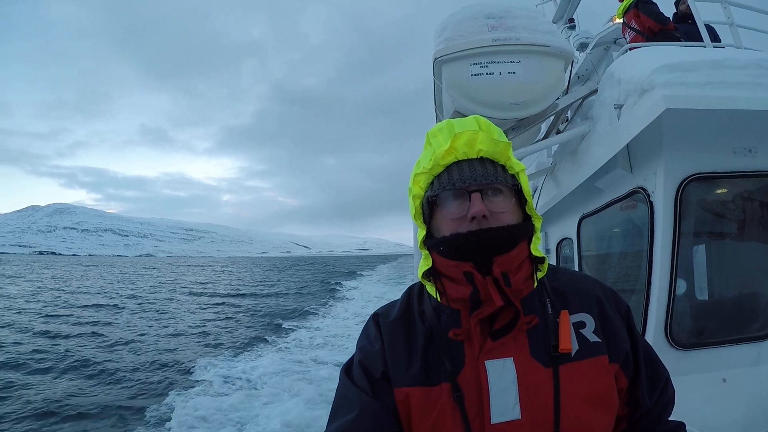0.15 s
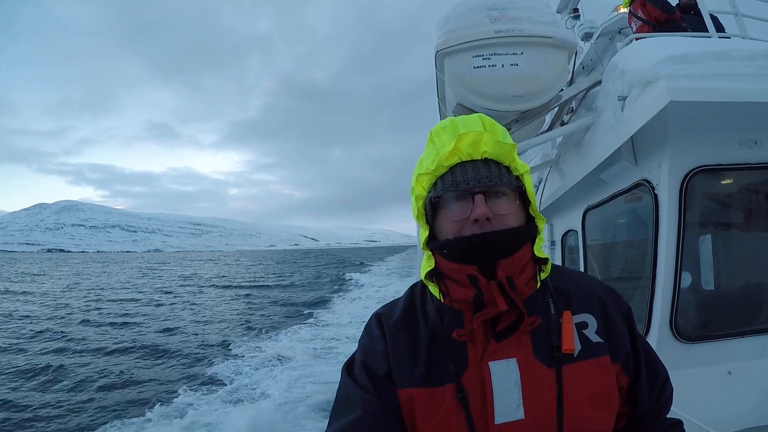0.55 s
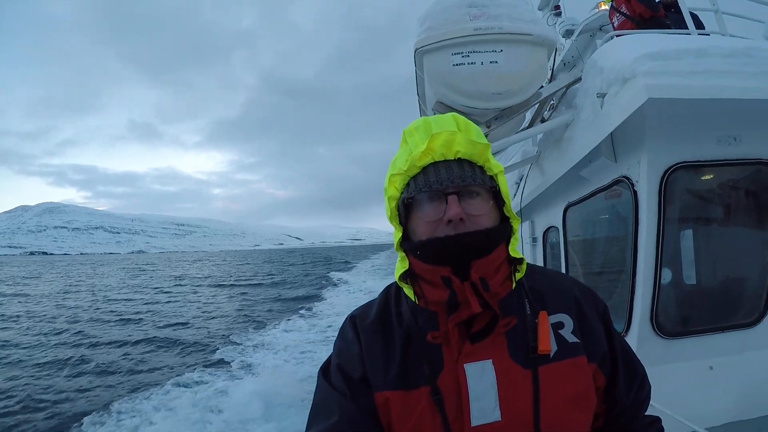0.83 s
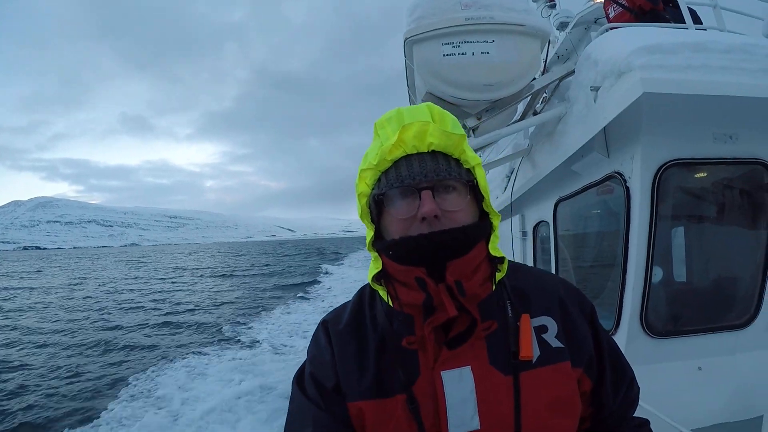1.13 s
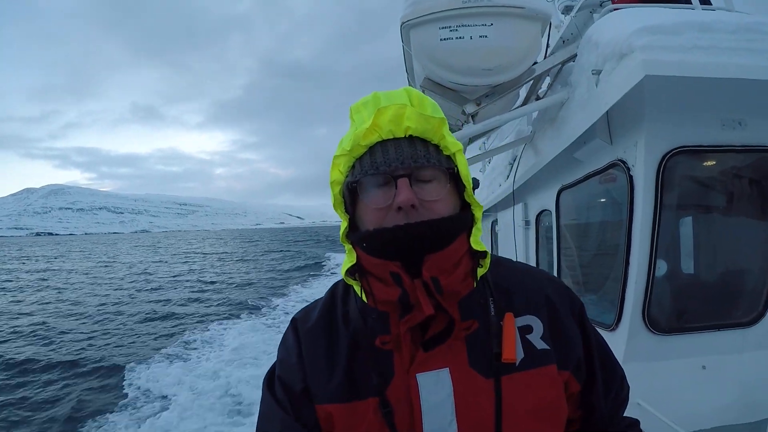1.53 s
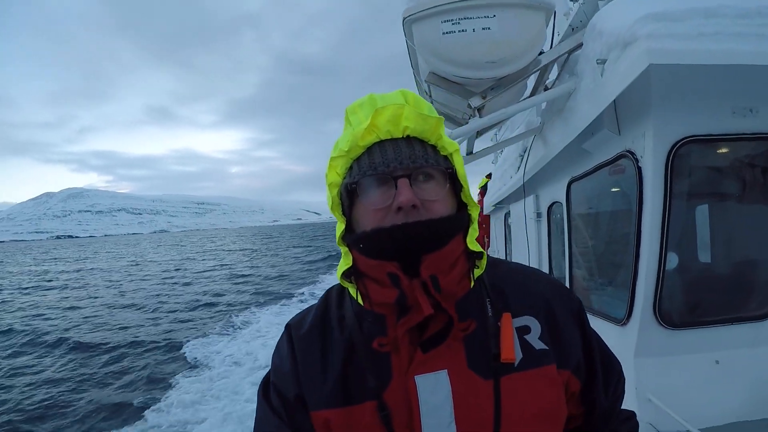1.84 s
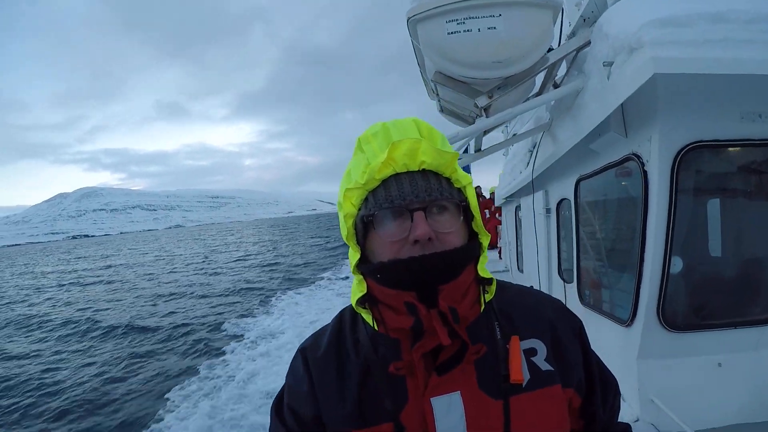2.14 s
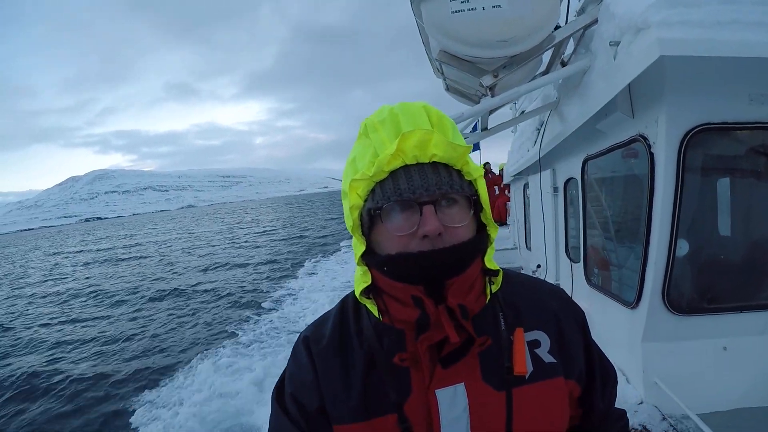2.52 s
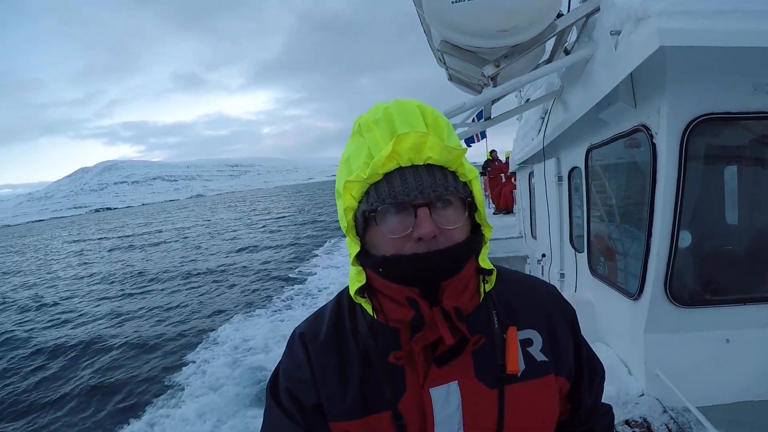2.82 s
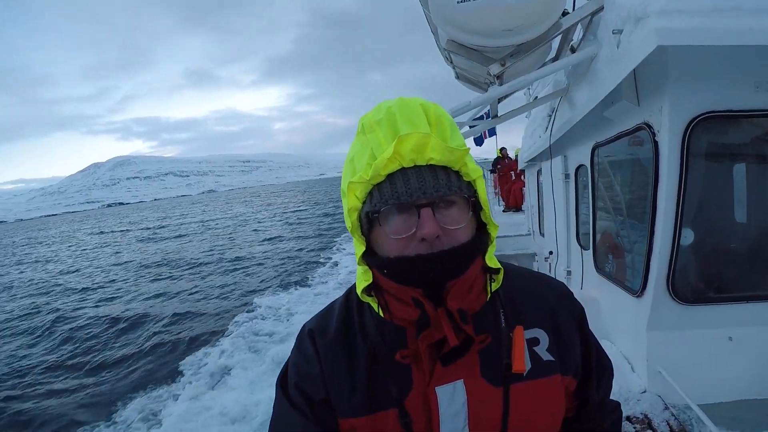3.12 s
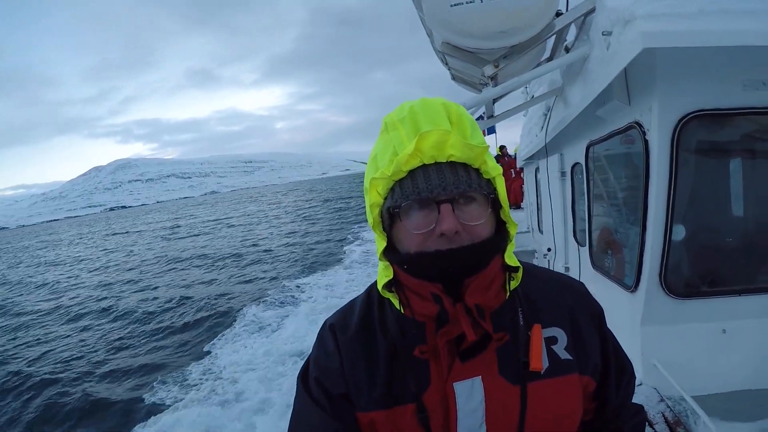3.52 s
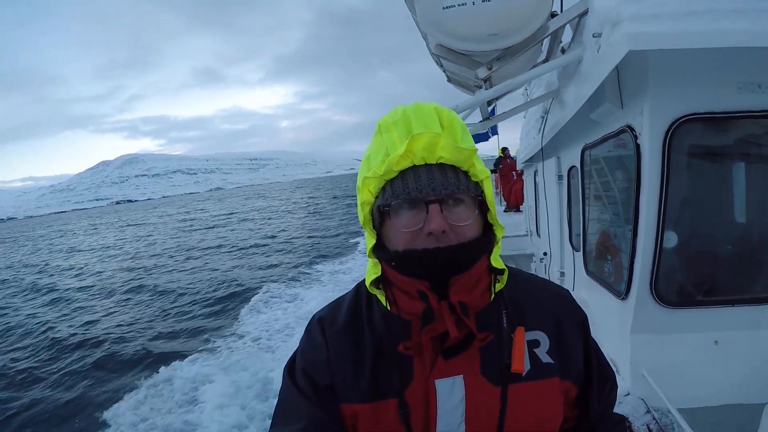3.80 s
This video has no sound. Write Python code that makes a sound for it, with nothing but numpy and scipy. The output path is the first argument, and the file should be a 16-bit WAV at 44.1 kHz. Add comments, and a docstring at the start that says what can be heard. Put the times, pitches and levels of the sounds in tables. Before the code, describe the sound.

Motor boat under way at sea: two low diesel engines drone slightly out of step, throbbing about three times a second, while wake water rushes and fizzes beside the hull; microphone on open deck, lightly wind-buffeted.

```python
"""Motor boat under way

On the open deck at sea, two diesel engines drone slightly out of step, so their tones throb about
three times a second; each tone is a cosine, and shaped noise adds a rough exhaust rumble.
The water churns, splashes, fizzes and sprays beside the hull: hiss and ringing bubbles that surge.
A little wind buffets the microphone: low noise whose loudness wanders."""
import sys
import numpy as np
from scipy import signal
from scipy.fft import rfft, irfft, next_fast_len
from scipy.io import wavfile
from scipy.ndimage import uniform_filter1d, minimum_filter1d

SR = 44100
rng = np.random.default_rng(int(sys.argv[2]) if len(sys.argv) > 2 else 0)


def master(y):
    """Save y as 16-bit WAV."""
    cut = np.clip(np.atleast_2d(y).T, -1, 1)
    pcm = np.round(cut * 32767)  # scale
    wavfile.write(sys.argv[1], SR, pcm.astype(np.int16))


N = 174636   # length in samples, just under 4 s


def engines():
    """Two engines at nearly the same speed drift in and out of step, over their exhaust rumble."""
    port, starboard = firing_phase(40.185), firing_phase(41.785)   # firings per second
    return exhaust_tones(port, starboard) + exhaust_rumble(port)


IN_STEP_S = 1.975           # around this moment both engines fire together
TIMING_WANDER_S = 0.00007   # typical error in the firing times


def firing_phase(firing_hz):
    """An engine fires at a steady rate with slightly wandering timing; phase in radians."""
    time_s = np.arange(N) / SR - IN_STEP_S
    return 2 * np.pi * firing_hz * (time_s + TIMING_WANDER_S * drift(0.67))


# Tones of the two exhausts, at multiples of the firing rate
# columns: multiple [times the firing rate], port_peak_db [dB], starboard_peak_db [dB]
EXHAUST_TONES = [(1, -34, -47), (2, -11, -20), (3, -29, -28), (4, -45, -30), (5, -40.5, -33)]


def exhaust_tones(port, starboard):
    """Regular firing makes tones at multiples of its rate; close pairs of tones beat together."""
    tones = 0
    for multiple, port_db, starboard_db in EXHAUST_TONES:
        pipe_phase = rng.uniform(0, 2 * np.pi)   # shared by both engines
        for phase, peak_db in ((port, port_db), (starboard, starboard_db)):
            tones = tones + from_db(peak_db) * np.cos(round(multiple) * phase + pipe_phase)
    return tones


# Colour of the exhaust and hull rumble
# columns: pitch_hz [Hz], relative_level_db [dB per Hz]
RUMBLE_COLOUR = [(8, -20), (22, -15), (33, -11), (46, -6), (60, -5.5), (74, -2.5), (92, -4.5), (108, -2),
                 (123, .5), (155, -8.5), (200, -10), (250, -13.5), (340, -22), (600, -40)]
# Loudness of the rumble over time
# columns: time_s [s], level_db [dB]
RUMBLE_LEVEL = [(0, -23.5), (.9, -19), (1.7, -21.5), (2.4, -22.5), (2.7, -22.5), (3.0, -22), (3.96, -21.5)]
RUMBLE_PULSING = 0.38   # depth of the swell, as a fraction


def exhaust_rumble(port):
    """Rough noise from exhaust and hull swells with each firing of the port engine."""
    puffs = rng.standard_normal(N) * (1 + RUMBLE_PULSING * np.cos(port))
    return level(RUMBLE_LEVEL) * coloured(puffs, RUMBLE_COLOUR)


def water():
    """Deep churning, the splashing wake, and the foam and spray it leaves."""
    return churn() + wake() + foam_and_spray()


# Loudness of the water heaving along the hull
# columns: time_s [s], level_db [dB]
CHURN_LEVEL = [(0.07, -26.5), (0.33, -28), (0.58, -27), (0.76, -29), (1.2, -31), (1.6, -30.5), (2.0, -28),
               (2.4, -30), (2.8, -32.5), (3.05, -31.0), (3.5, -31.5), (3.96, -28.5)]
# Colour of that heaving water
# columns: pitch_hz [Hz], relative_level_db [dB per Hz]
CHURN_COLOUR = [(150, -44), (260, -2), (330, 0), (480, -0.5), (650, -1), (900, -10.5), (1500, -20)]


def churn():
    """Water heaving along the hull blurs into low, smooth noise."""
    return surge(coloured(rng.standard_normal(N), CHURN_COLOUR), CHURN_LEVEL, flutter_db=0.5)


# Loudness of the breaking wake
# columns: time_s [s], level_db [dB]
WAKE_LEVEL = [(0.07, -24), (0.28, -24), (0.57, -21), (0.8, -24), (1.05, -25.5), (1.3, -24), (1.55, -25.5),
              (1.82, -23), (2.05, -23.0), (2.2, -28), (2.35, -26), (2.52, -23.5), (2.7, -27.5), (2.92, -26),
              (3.2, -25), (3.42, -26), (3.65, -24.5), (3.96, -25.5)]
# Colour of the breaking wake
# columns: pitch_hz [Hz], relative_level_db [dB per Hz]
WAKE_COLOUR = [(350, -56), (600, -15), (800, -2), (1150, -0.44), (1550, 1), (1950, 1.5), (2400, -3),
               (2900, -10), (3400, -19), (5000, -42)]


def wake():
    """The breaking crest mixes larger, lower-pitched ringing bubbles with a smooth rush."""
    splashes = rush(bubbles(low_hz=648, high_hz=2800, cycles=7.8), share=0.072)
    return surge(coloured(splashes, WAKE_COLOUR), WAKE_LEVEL, flutter_db=0.2)


# Loudness of the bursting foam
# columns: time_s [s], level_db [dB]
FOAM_LEVEL = [(0.07, -24.5), (0.3, -24.5), (0.57, -22.5), (0.75, -24), (1.08, -25.7), (1.4, -25.5),
              (1.62, -25), (1.9, -24), (2.1, -26.5), (2.27, -27), (2.5, -23), (2.75, -25), (3.02, -27),
              (3.2, -24), (3.4, -25.5), (3.65, -23), (3.96, -25.5)]
# Colour of the bursting foam
# columns: pitch_hz [Hz], relative_level_db [dB per Hz]
FOAM_COLOUR = [(2200, -6), (3100, -11), (3550, -7), (4050, -1.7), (4550, -0.5), (5200, -3), (6100, -8),
               (6800, -12), (7600, -17), (8300, -31), (10000, -38), (12000, -65)]
# Loudness of the finest spray
# columns: time_s [s], level_db [dB]
SPRAY_LEVEL = [(0.07, -45), (0.65, -50), (1.2, -47), (1.35, -45), (1.9, -45), (2.22, -52.0), (2.47, -48.5),
               (2.7, -49.8), (3.03, -52), (3.35, -51), (3.68, -47.8), (3.96, -52)]
# Colour of the finest spray
# columns: pitch_hz [Hz], relative_level_db [dB per Hz]
SPRAY_COLOUR = [(6500, -4), (8000, -3.5), (8800, -4), (10000, -5.5), (11000, -13), (12800, -20),
                (14200, -23), (15000, -33)]


def foam_and_spray():
    """Small, high bubbles make one fizz, heard in a foam band and in a higher spray band."""
    fizz = rush(bubbles(low_hz=2960, high_hz=13000, cycles=5.1), share=0.13)
    foam = surge(coloured(fizz, FOAM_COLOUR), FOAM_LEVEL, flutter_db=0.48)
    spray = surge(coloured(fizz, SPRAY_COLOUR), SPRAY_LEVEL, flutter_db=0.48)
    return foam + spray


FLUTTERS_PER_S = 11.6


def surge(sound, levels, flutter_db):
    """Water rises and falls with the waves and flutters as it tumbles."""
    return sound * level(levels) * from_db(flutter_db * drift(FLUTTERS_PER_S))


BUBBLES_PER_S, BUBBLE_SPREAD_DB = 4000, 2.5


def bubbles(low_hz, high_hz, cycles, count=20):
    """Bubbles burst at random, in many sizes and pitches, each ringing for a few cycles."""
    size_db = BUBBLE_SPREAD_DB * np.minimum(rng.exponential(1, N), 5)
    sizes = from_db(size_db) * rng.choice([-1, 1], N)
    bursts = sizes * (rng.random(N) < BUBBLES_PER_S / SR)
    pitch_number = rng.integers(0, count, N)   # deals every burst to one of the pitches
    total = 0
    for number, hz in enumerate(np.geomspace(low_hz, high_hz, count)):
        clicks = bursts * (pitch_number == number)
        total = total + hz * ring(clicks, hz, cycles / hz)   # higher pitches ring more strongly
    return rms_one(total)


def ring(clicks, hz, t60):
    """Each click starts a sine that decays by 60 dB in t60 seconds."""
    decay = from_db(-60 / (t60 * SR))   # gain per sample
    turn = 2 * np.pi * hz / SR          # radians per sample
    feedback = [1, -2 * decay * np.cos(turn), decay ** 2]
    return signal.lfilter([0, np.sin(turn)], feedback, clicks + 1e-18)


def rush(grains, share):
    """Near, distinct bursts get a share of the power; the smooth hiss of far ones gets the rest."""
    return np.sqrt(share) * grains + np.sqrt(1 - share) * rng.standard_normal(N)


# Colour of the wind on the microphone
# columns: pitch_hz [Hz], relative_level_db [dB per Hz]
WIND_COLOUR = [(10, -16), (36, 5), (90, 10), (200, -30), (500, -44)]
WIND_DB, GUST_DB, GUSTS_PER_S = -33.5, 5.5, 3.5   # middle level, its typical wander and speed


def wind():
    """Wind buffets the microphone: low noise with a lumpy, wandering level."""
    gusts = from_db(WIND_DB + GUST_DB * drift(GUSTS_PER_S))
    return gusts * coloured(rng.standard_normal(N), WIND_COLOUR)


def from_db(db):
    """Turn decibels into a gain."""
    return 10 ** (np.asarray(db) / 20)


def rms_one(x):
    """Scale to unit power."""
    return x / np.sqrt(np.mean(x ** 2) + 1e-20)


def level(rows):
    """Draw a gain over time through (time_s, level_db) points."""
    time_s, level_db = np.transpose(rows)
    return from_db(np.interp(np.arange(N) / SR, time_s, level_db))


def drift(rate):
    """Smooth random wander at about `rate` turns a second, with a spread of 1."""
    step = 40   # samples between the points of the slow curve
    r = np.exp(-2 * np.pi * step * rate / SR)
    noise = rng.standard_normal(N // step + 2002)
    slow = signal.lfilter([1], [1, -2 * r, r * r], noise)[2000:]   # drop the filter's start-up
    return np.interp(np.arange(N) / step, np.arange(len(slow)), rms_one(slow))


def coloured(x, spectrum):
    """Weight each pitch by (pitch_hz, level_db) points, silent outside them; unit power."""
    pitch_hz, level_db = np.transpose(spectrum)
    size = next_fast_len(N + SR)
    bins = np.maximum(np.fft.rfftfreq(size, 1 / SR), 1)
    bins_db = np.interp(np.log(bins), np.log(pitch_hz), level_db, left=-np.inf, right=-np.inf)
    return rms_one(irfft(rfft(x, size) * from_db(bins_db), size)[:N])


def scene():
    """Engines, water and wind add up at one microphone on deck."""
    return (engines() + water() + wind())[None, :]


START_S, FADE_S = 0.067, 0.004    # silence before the sound cuts in; length of each edge
CEILING, LIMITER_S = 0.78, 0.008  # peak size where limiting begins; smoothing time
CUTOFF_HZ = 14900


def record(dry):
    """The sound cuts in and out abruptly; a fast limiter holds down peaks; the top is cut off."""
    t, size = np.arange(N) / SR, int(LIMITER_S * SR)
    running = np.clip(np.minimum(t - START_S, t[-1] - t) / FADE_S, 0, 1)
    headroom = CEILING / np.maximum(np.abs(dry), CEILING)
    # hold the lowest gain around each peak, then smooth it
    gain = uniform_filter1d(minimum_filter1d(headroom, 2 * size), size)
    low_pass = signal.ellip(10, .1, 90, CUTOFF_HZ, fs=SR, output="sos")
    return signal.sosfilt(low_pass, dry * gain * running)


dry = scene()
out = record(dry)
master(out)
```